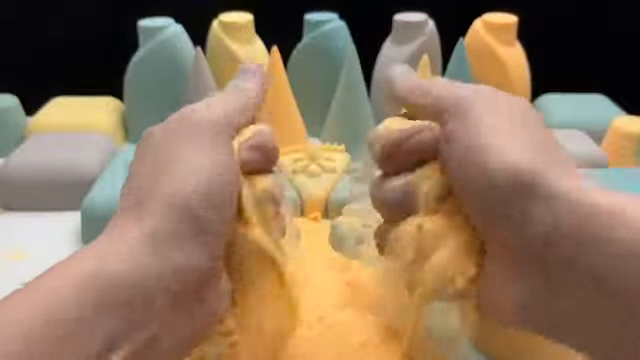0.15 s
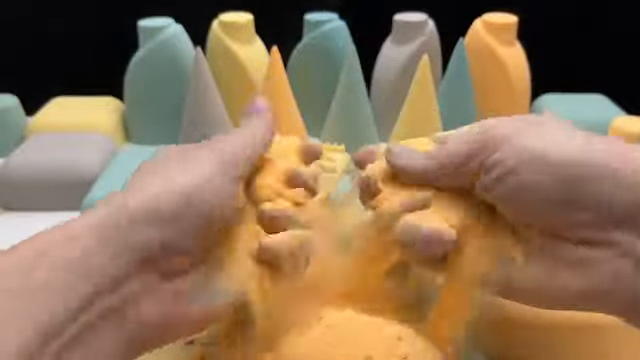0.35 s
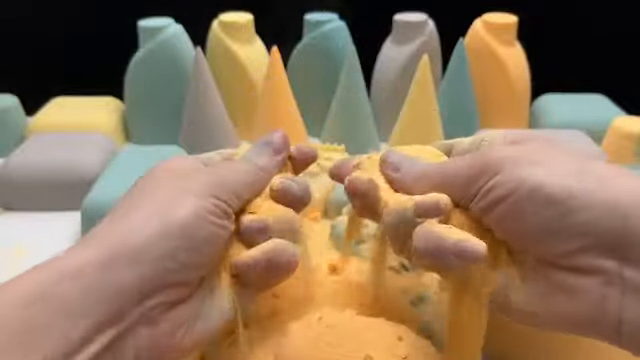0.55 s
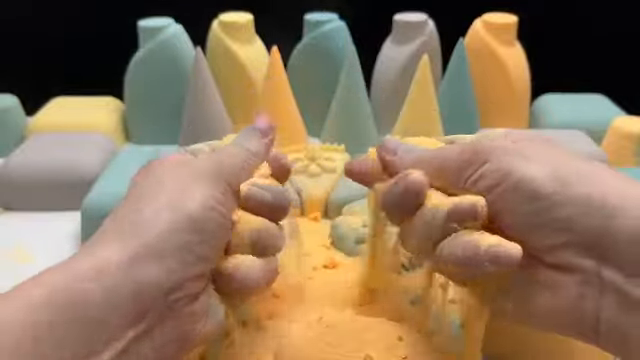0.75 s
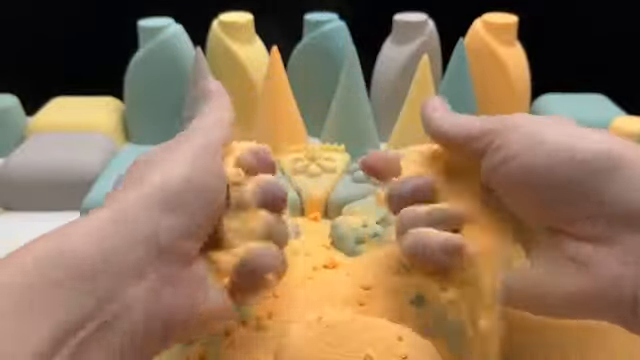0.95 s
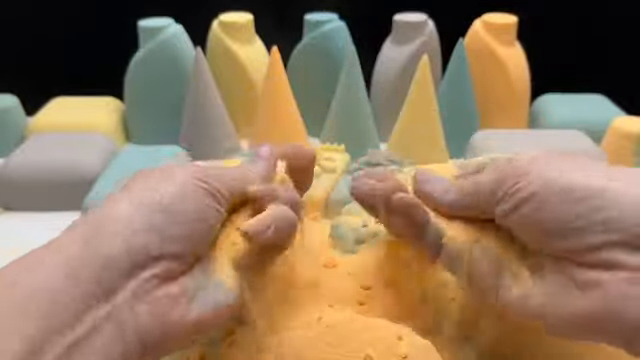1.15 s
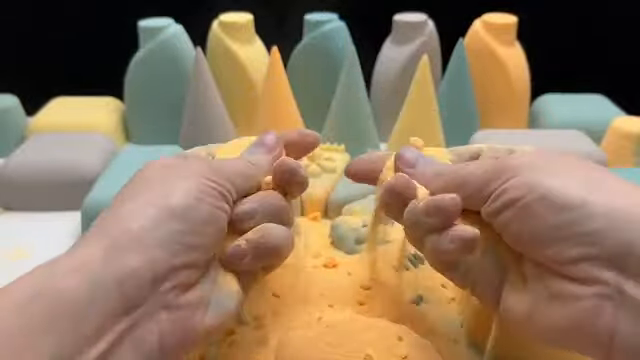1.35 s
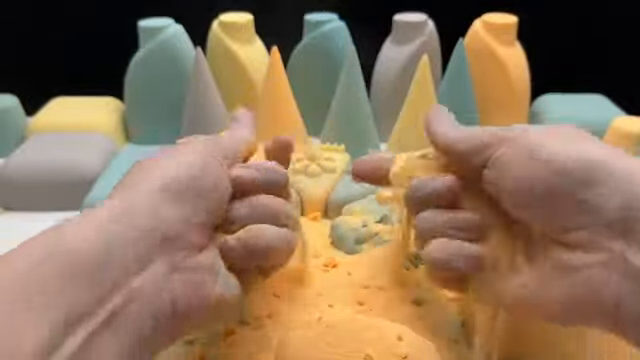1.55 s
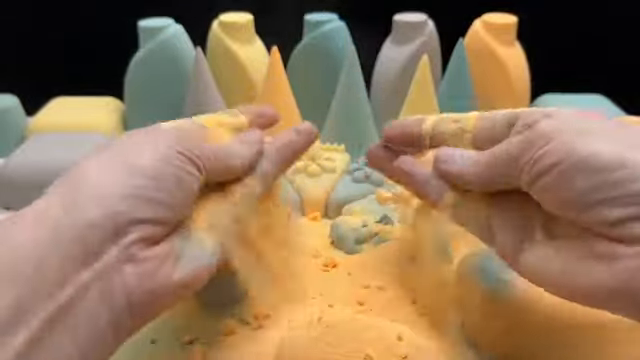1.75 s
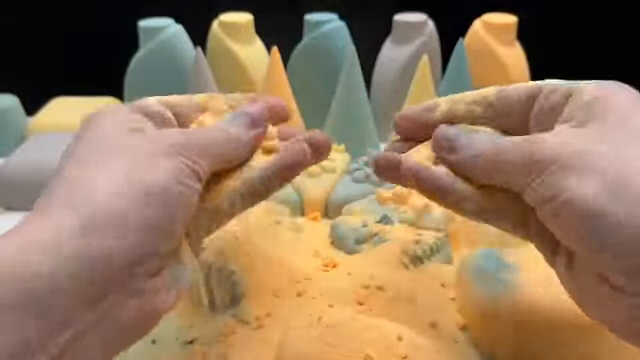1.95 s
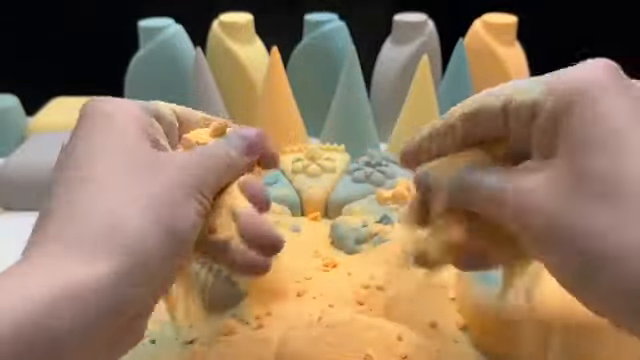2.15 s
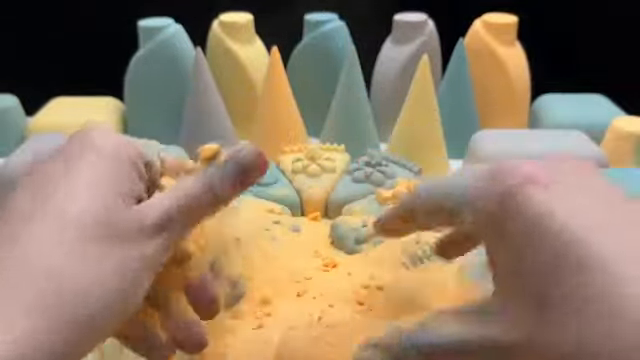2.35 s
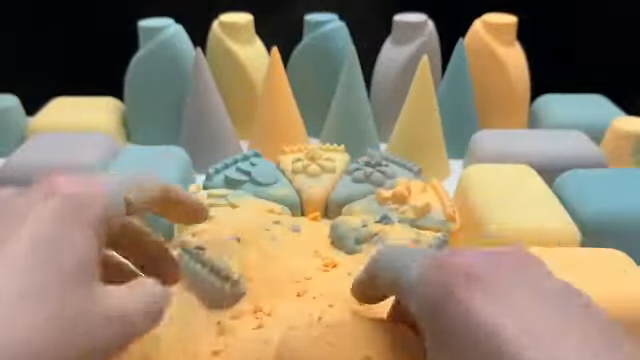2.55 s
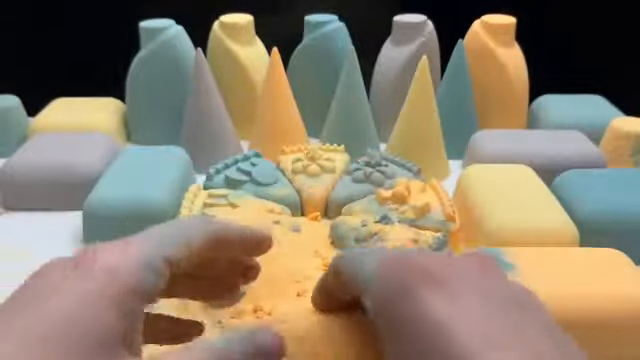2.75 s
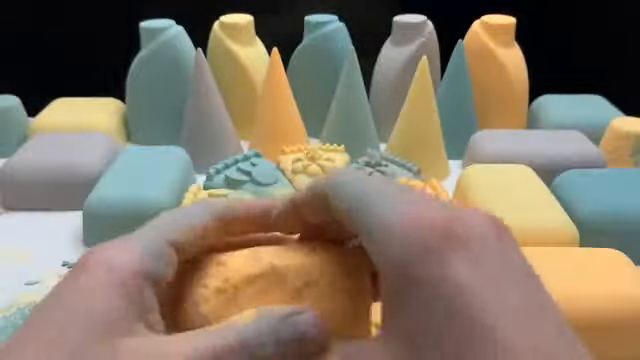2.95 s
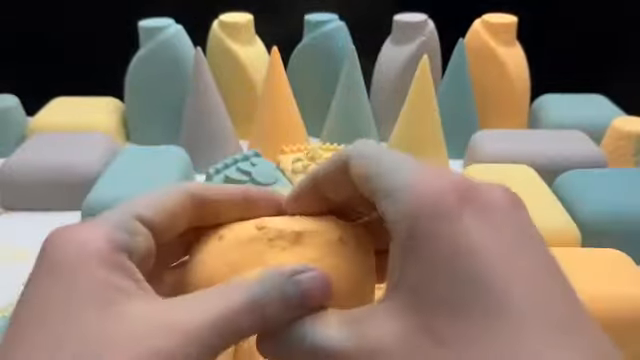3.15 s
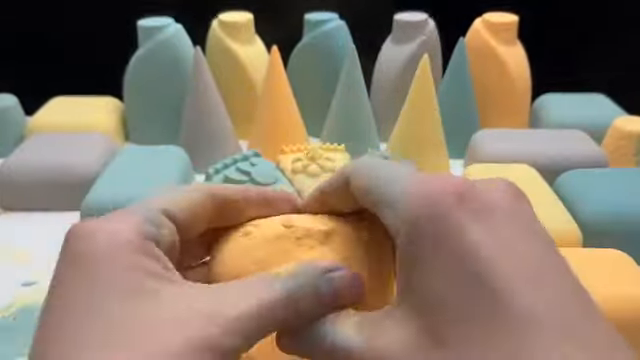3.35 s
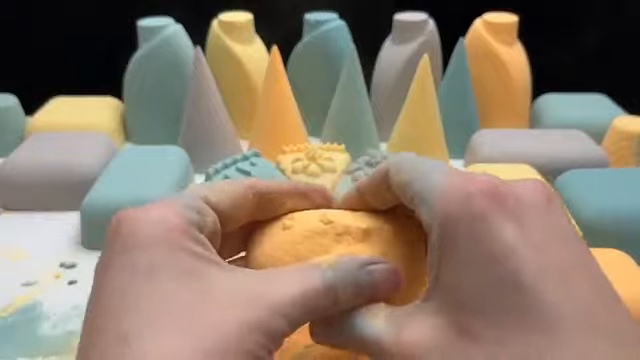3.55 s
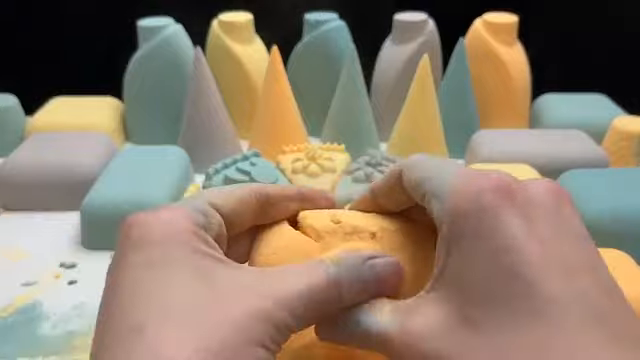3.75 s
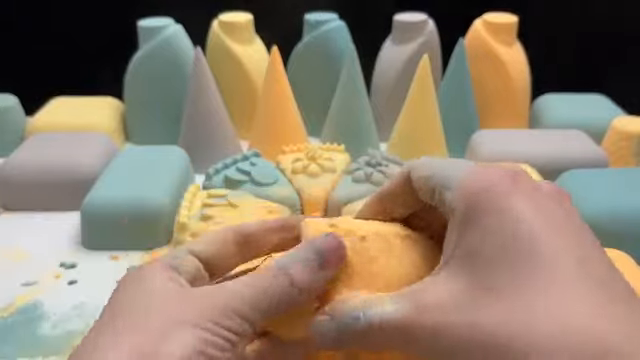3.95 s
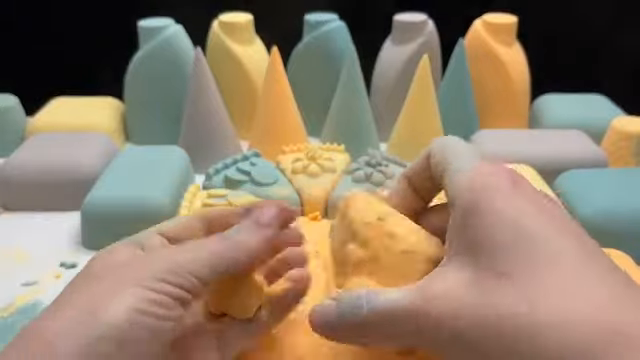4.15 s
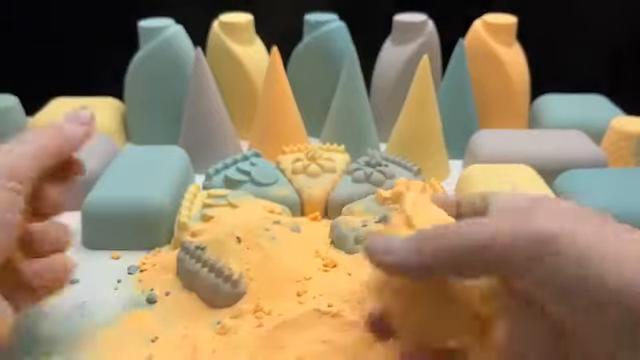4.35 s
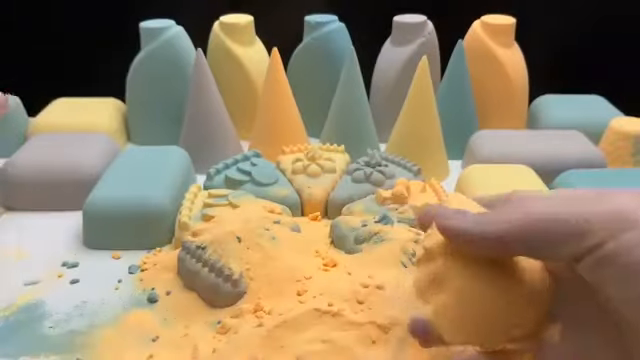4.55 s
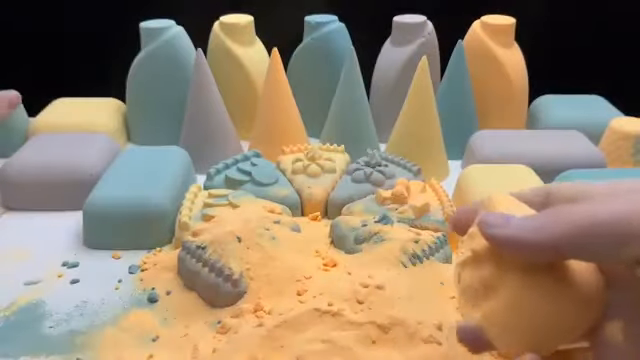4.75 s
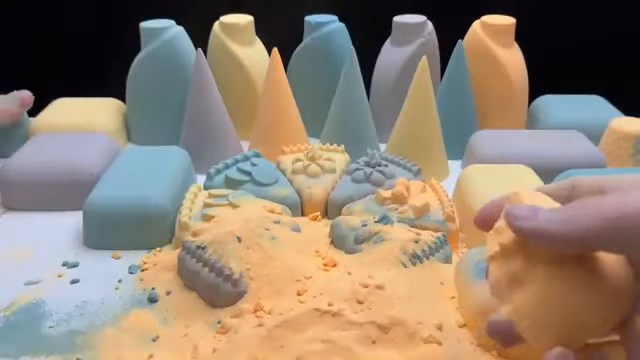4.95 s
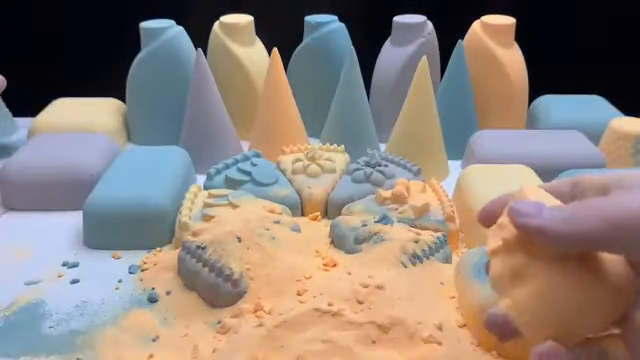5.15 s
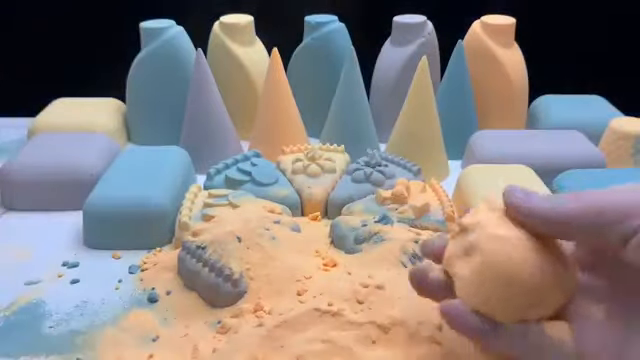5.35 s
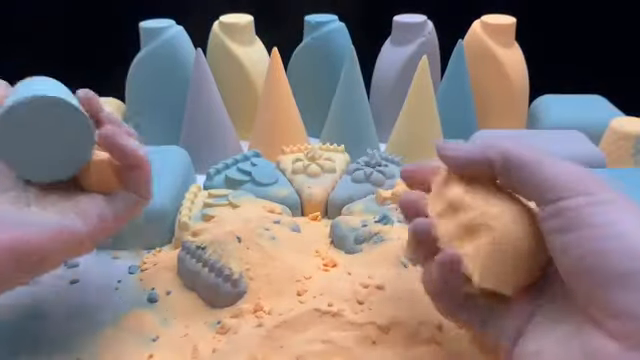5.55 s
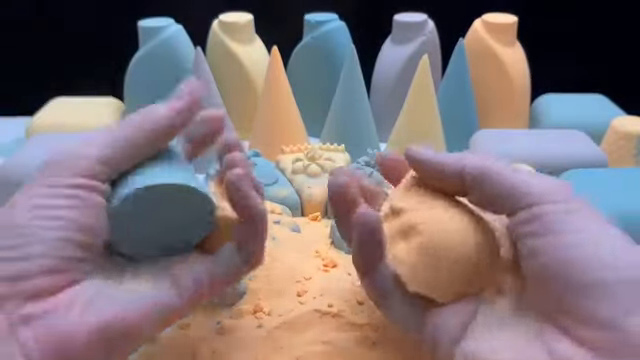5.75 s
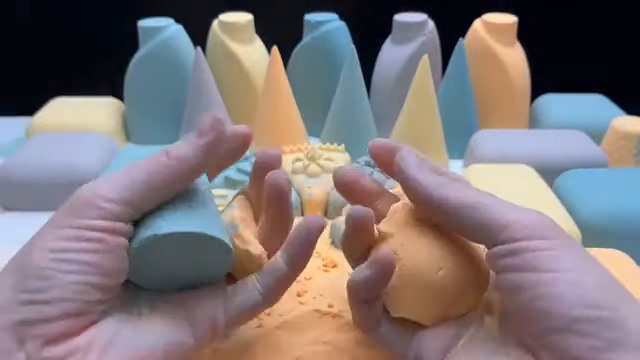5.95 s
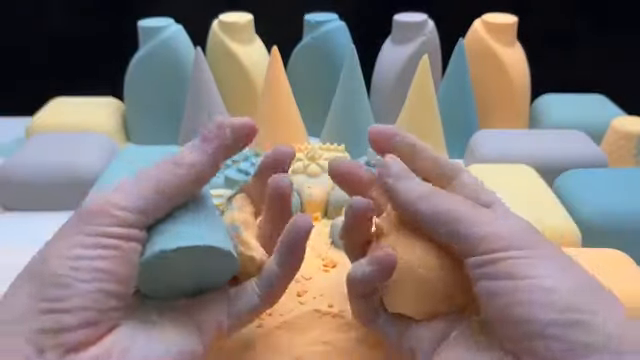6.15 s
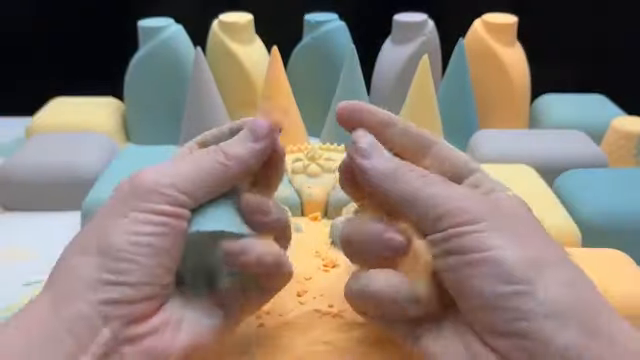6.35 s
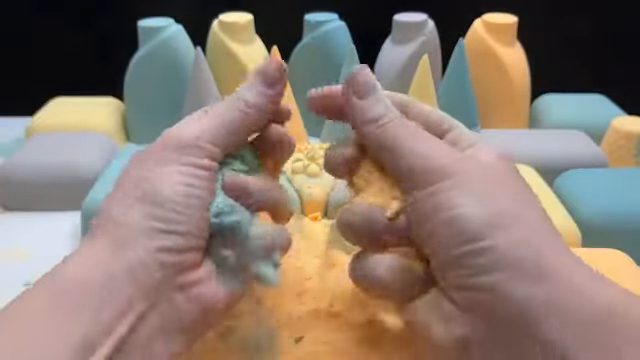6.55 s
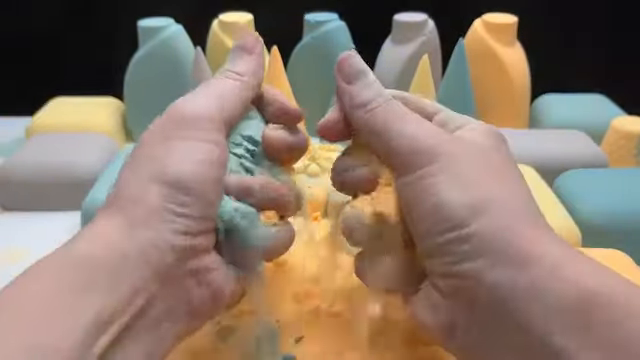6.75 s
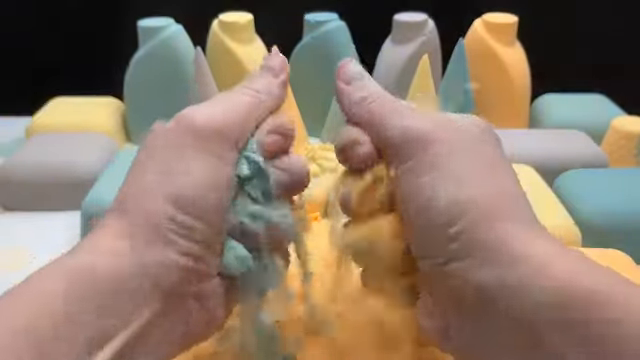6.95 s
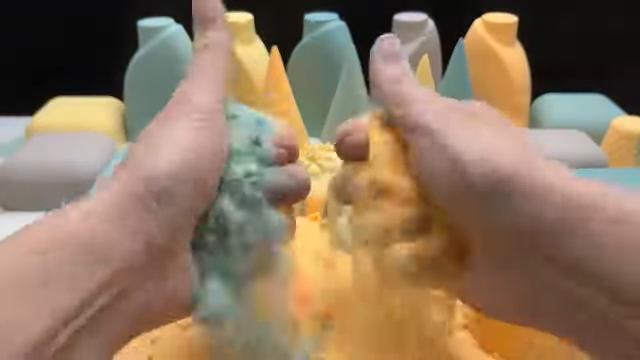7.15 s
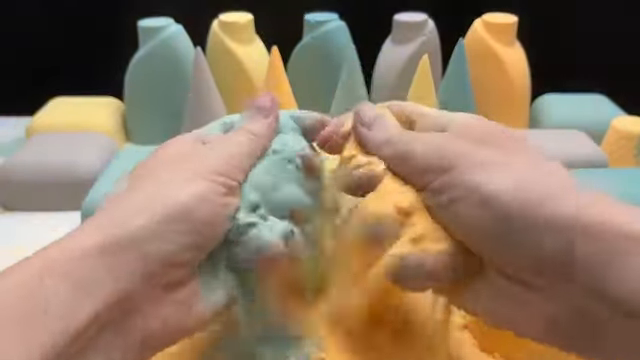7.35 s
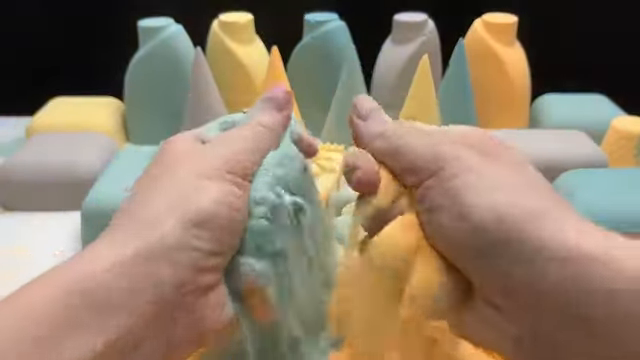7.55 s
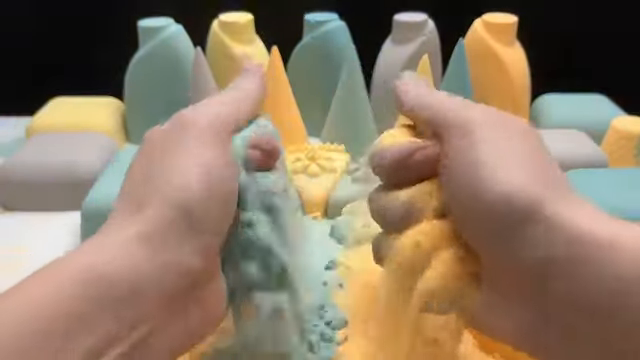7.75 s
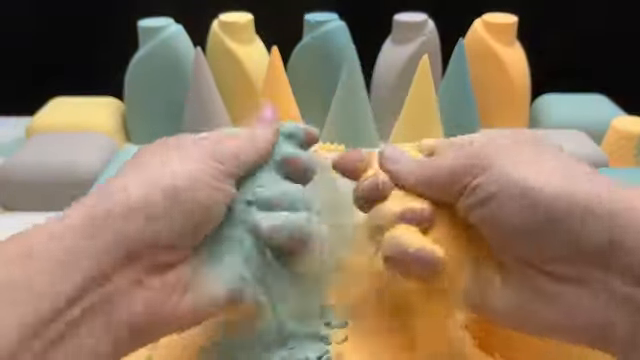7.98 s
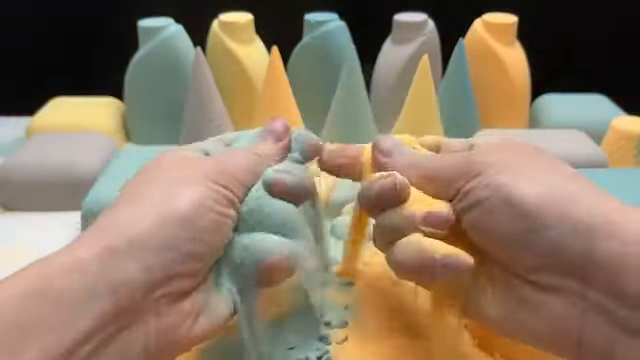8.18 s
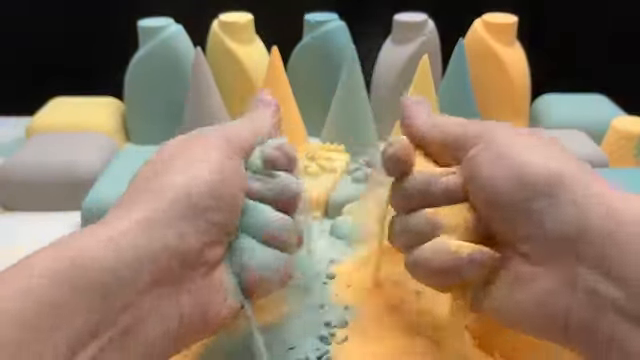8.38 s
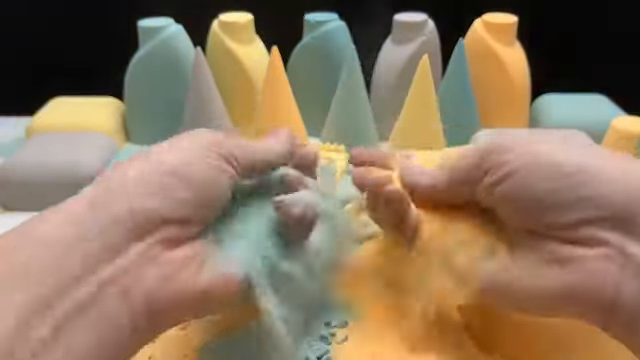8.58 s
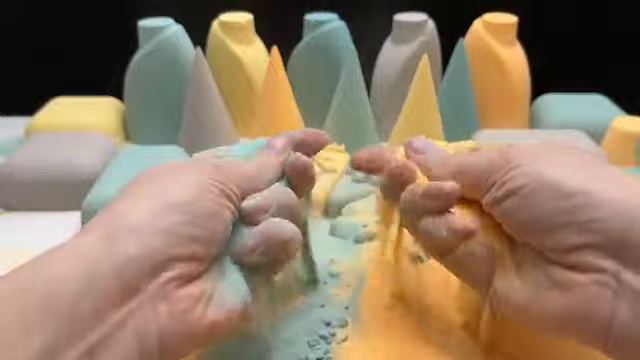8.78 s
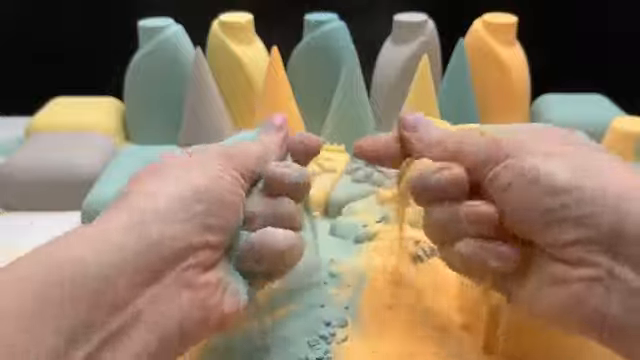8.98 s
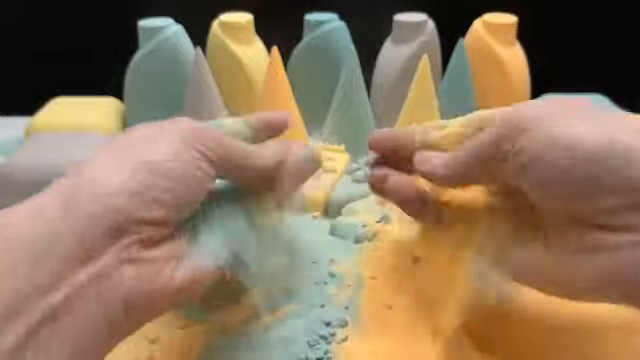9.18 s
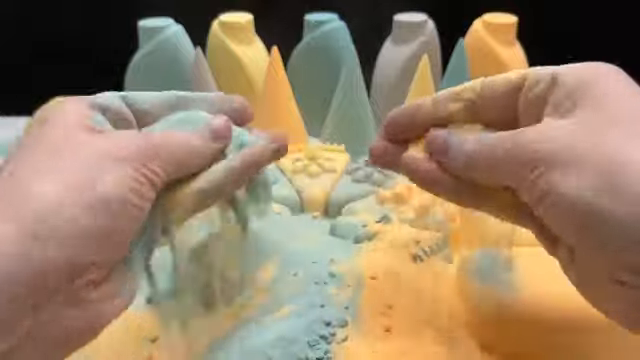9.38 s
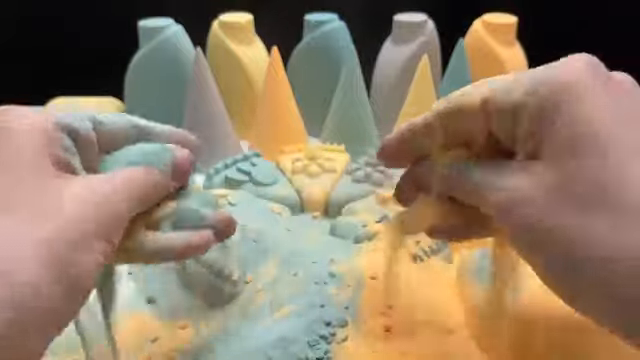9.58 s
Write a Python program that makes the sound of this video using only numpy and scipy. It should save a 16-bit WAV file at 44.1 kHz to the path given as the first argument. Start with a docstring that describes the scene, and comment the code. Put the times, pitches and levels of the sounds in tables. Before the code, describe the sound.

Very close stereo in a small quiet room: hands squeeze crumbly powder in four soft gritty crunches, grains hissing and lumps plopping into the heap. A quieter stretch follows, with fingers brushing a smooth block and one crisp crack. Then two blocks are crushed together, with loud dense crackling and knocks, followed by gentler squeezes and pouring.

```python
"""Two hands squeeze soft moulded blocks of baking soda close to a pair of microphone ports in a small room.
Lumps break off and plop into the heap below: short sine waves whose pitch dives as they sink.
Crumbs and hard chips fall with them, crusts crack, and loose powder pours as streams of tiny clicks.
The grains rubbed between the fingers make a fine gritty hiss, from denser streams of clicks.
Coloured noise makes a low room rumble; the knocks ring briefly in the room."""
import sys
import numpy as np
from scipy import signal
from scipy.fft import rfft, irfft, next_fast_len
from scipy.io import wavfile

SR = 44100
rng = np.random.default_rng(int(sys.argv[2]) if len(sys.argv) > 2 else 0)


def int16_out(signal):
    """Quantize to a 16-bit WAV file."""
    q = np.round(np.clip(np.atleast_2d(signal).T, -1, 1) * 32767)
    wavfile.write(sys.argv[1], SR, q.astype(np.int16))


N = 424241
TIME = np.arange(N) / SR
PADDED = next_fast_len(N + SR // 2)   # room for half a second of tail
BINS_HZ = np.maximum(np.arange(PADDED // 2 + 1) * SR / PADDED, 1)
PORT_SIGNS = np.array([[1], [-1]])   # left, right

# the big lumps landing in the heap, before each layer's trim:
# [t/s, level/dB, settling time/s, pitch at first contact f/Hz, level of its cracking skin/dB]
LUMPS = [(.049, -32, .0066, 4430, -37), (.1039, -26.5, 0.004, 7000, -29), (0.1221, -15, 0.0031, 2900, -25),
         (.585, -22, 0.009, 2140, -36), (0.6262, -31, .008, 1480, -42), (.635, -35, .004, 2500, -34),
         (0.6516, -30, .0034, 1480, -33), (0.6671, -19, 0.0073, 4740, -27),
         (0.6722, -28, 0.0038, 1280, -38), (0.7098, -27.5, 0.0059, 6040, -33),
         (1.2906, -21.5, 0.0074, 4380, -20.5), (1.3423, -20.5, 0.0029, 4950, -18),
         (1.363, -26, 0.0081, 6000, -19), (1.3786, -21, 0.0016, 7000, -21),
         (1.918, -16.5, 0.00099, 4220, -13), (1.9774, -30, 0.0035, 4650, -25),
         (1.984, -27.5, .0062, 3900, -25), (2.0012, -29, .003, 3030, -33), (2.0185, -26, .005, 3640, -24),
         (3.606, -19.5, 0.0032, 5700, -15.5), (6.3677, -17.5, 0.0023, 1640, -28),
         (6.3895, -12.5, 0.0017, 7100, -19), (6.4116, -19, 0.0029, 5960, -27),
         (6.5334, -21.5, .0062, 5950, -29), (6.5464, -29, .003, 3000, -29),
         (6.601, -16.5, 0.003, 6000, -29), (6.6464, -20.5, 0.0034, 6040, -25),
         (6.6837, -24, 0.006, 6000, -24), (6.7444, -23.5, 0.016, 1530, -40),
         (6.7642, -14.5, 0.0015, 3640, -19), (6.783, -15.5, 0.0012, 2250, -19),
         (6.7978, -20, 0.0016, 1500, -31), (6.8226, -17.5, 0.0021, 7000, -13.5),
         (6.8271, -18, 0.013, 2350, -28), (6.8577, -18, 0.016, 5070, -13), (6.875, -12, 0.0017, 5000, -27),
         (6.8948, -21, 0.0018, 4000, -23), (6.95, -23.5, 0.002, 3470, -27),
         (6.9561, -25.5, 0.017, 6920, -20), (6.967, -22.5, 0.0017, 4600, -22),
         (6.9796, -26, .002, 3500, -23), (7.4222, -24, 0.0013, 1830, -30), (7.5473, -26, 0.0031, 2500, -32),
         (7.5532, -31, .003, 2500, -32), (7.578, -35, 0.0027, 3000, -30), (7.6434, -20, 0.0021, 6000, -23),
         (7.6492, -24, .005, 7000, -24), (7.6958, -16.5, 0.0037, 1890, -28),
         (7.734, -30, 0.0018, 2500, -26), (7.7416, -17.5, 0.0024, 1570, -35),
         (7.791, -20, 0.0034, 2540, -19), (7.7942, -19.5, 0.005, 1420, -38),
         (8.159, -18, 0.0047, 1610, -26), (8.2027, -27, 0.0033, 1800, -33), (8.211, -23, 0.0037, 2300, -34),
         (8.2243, -26.5, 0.017, 1420, -35), (8.244, -21, 0.005, 2950, -25),
         (8.308, -20.5, 0.0031, 2400, -30), (8.314, -30, 0.0018, 3000, -32),
         (8.7696, -14, 0.0036, 5500, -14.5), (8.797, -21, 0.0019, 4560, -26),
         (8.8067, -21.5, .0031, 4740, -29), (8.8264, -31, .002, 3500, -24), (8.87, -26, 0.0075, 5000, -29),
         (8.8792, -35, 0.0028, 3000, -23), (8.91, -28, .004, 2500, -29), (8.943, -27.5, 0.0048, 5670, -25),
         (9.493, -30, 0.0064, 3700, -40), (9.5041, -26.5, 0.002, 4500, -26),
         (9.5155, -32, 0.0027, 2980, -22)]
# colour of coarse grains grinding: [f/Hz, level/dB]
GRIND_COLOUR = [(500, -17), (1200, -5.5), (1550, -5.5), (1900, 0.5), (2600, 2.5), (3400, 1), (4800, -2.5),
                (7500, -5), (14000, -48)]
# how alike the two ports hear a wide sound: [f/Hz, likeness 0-1]
LIKENESS = [(60, .92), (250, .78), (700, .52), (1400, .2), (2000, .75), (3800, .38), (6500, .55),
            (7500, .72), (8200, .97), (8800, .95), (9500, .68), (12000, .86), (15000, .65)]


def from_db(db):
    """Decibels to gain."""
    return np.exp(np.asarray(db) * np.log(10) / 20)


def power_db(power):
    """Power to decibels."""
    return 10 * np.log10(power)


def rms_one(x):
    """Scale to unit rms."""
    return x / np.sqrt(np.mean(x ** 2) + 1e-20)


def at_bins(points):
    """A table over log frequency, read at every spectral bin."""
    hz, value = np.transpose(points)
    return np.interp(np.log(BINS_HZ), np.log(hz), value)


def add(track, s, sound):
    """Mix a sound into a track at a time."""
    start = int(s * SR)
    part = sound[..., :max(N - start, 0)]
    track[..., start:start + part.shape[-1]] += part


def drift(per_s):
    """A slow random wander with rms 1, heading for a new random value per_s times a second."""
    knots = rng.standard_normal(4096)
    return rms_one(np.interp(TIME * per_s, np.arange(len(knots)), knots))


def grains(per_s, spread_db):
    """Two unrelated streams of tiny clicks with random times, sizes and signs."""
    count = int(per_s * N / SR) * 2
    when, size, sign = rng.random((count, 3)).T
    # a positive spread makes a few clicks large, a negative one makes a few small
    size_db = spread_db * np.minimum(-np.log(1 - size), 4)
    clicks = from_db(size_db) * (2 * sign - 1)
    return np.bincount((when * 2 * N).astype(int), clicks, 2 * N).reshape(2, N)


def spread_source(streams, colour):
    """Colour two streams and share them between the ports as a wide source; rms 1."""
    mid, side = rfft(streams, PADDED) * from_db(at_bins(colour))
    alike = np.clip(at_bins(LIKENESS), 0, .99)
    ports = np.sqrt(1 + alike) * mid + np.sqrt(1 - alike) * side * PORT_SIGNS
    return rms_one(irfft(ports, PADDED)[:, :N])


def swell(s, db, rise_s, fall_s, shape):
    """Power of a movement that builds up to a moment and dies away; shape 1 is exponential, 2 a bell."""
    away = np.maximum((s - TIME) / max(rise_s, 1e-3), (TIME - s) / max(fall_s, 1e-3))
    power, near = np.zeros(N), away < 10
    power[near] = from_db(db) ** 2 * np.exp(-2 * away[near] ** shape)
    return power


def slips(per_s, fade_s):
    """Packed powder gives way in sudden little slides that fade out; spread 1."""
    starts = (rng.random(N) < per_s / SR) * rng.random(N)
    slides = signal.lfilter([1], [1, -np.exp(-1 / (fade_s * SR))], starts + 1e-18)
    return rms_one(slides - slides.mean())


def plop(settle_s, contact_hz, turns=1.24):
    """A lump sinks into powder: the pitch dives as the contact widens, and dies within a few cycles."""
    t = TIME[:SR // 25]
    phase = 2 * np.pi * turns * np.log1p(t * contact_hz / turns)
    return np.sin(phase) * np.exp(-(t / max(settle_s, 1e-4)) ** (3 / 2))


def halts_db():
    """All the hand sounds dip as the fingers stop, and return quickly as they turn back."""
    # the fingers stop between two movements: [t/s, dip/dB, slowing time/s, restarting time/s]
    stops = [(1.105, -2.5, .04, .02), (1.75, -4, 0.056, 0.019), (2.585, -4, 0.026, .015),
             (2.96, -0.5, .04, .03), (5.335, -2.5, .03, .025), (7.32, -2.5, 0.04, .025),
             (8.69, -4, 0.08, .025), (9.28, -5, 0.11, .03)]
    total_db = 0
    for s, db, slow_s, restart_s in stops:
        side_s = np.where(TIME < s, slow_s, restart_s)
        total_db = total_db + db * np.exp(-((TIME - s) / side_s) ** 2)
    return total_db


def hand_work():
    """Add up the power of every hand movement into levels of pouring, grinding, sifting and brushing."""
    # the fists close and powder pours, then the fingers slide open, before each layer's trim:
    # [t/s at the height of the pour, pour level/dB, rise/s, fall/s, hiss level of the grip/dB,
    #  delay of the slide/s, slide level/dB, release of the slide/s, grinding over sifting in the slide/dB]
    squeezes = [(.09, -41, .085, 0.13, -44, 0.077, -44, 0.25, -6),
                (.642, -41, 0.098, 0.16, -48.5, 0.19, -42, .17, -6),
                (1.32, -44.5, 0.06, 0.14, -51, 0.18, -43.5, 0.13, -4),
                (1.988, -45, 0.099, .11, -46, 0.27, -42.5, 0.068, -6.5),
                (6.416, -35.5, 0.056, 0.074, -37.5, 0.3, -45.5, 0.17, -5),
                (6.802, -35, 0.18, .17, -41.5, .18, -42, 0.22, -3.5),
                (7.671, -38.5, 0.25, 0.11, -42.5, 0.11, -43, 0.21, -8.5),
                (8.208, -40.5, 0.072, 0.16, -52, 0.22, -41.5, .13, -6.5),
                (8.81, -40.5, 0.049, 0.15, -52, 0.21, -42.5, 0.14, -3.5),
                (9.51, -52, 0.1, .043, -50.5, .2, -47.5, .12, 0.5)]
    # fingers brush over a block while picking it up and turning it, before each layer's trim:
    # [t/s at the middle, skin hiss level/dB, half length/s, grinding over skin hiss/dB]
    brushes = [(0.358, -54.5, 0.043, -1), (1.184, -53.5, 0.048, 2.5), (2.108, -43.5, 0.028, -4),
               (2.627, -64, 0.023, -25), (2.794, -54.5, 0.11, -21), (3.08, -52, 0.085, -25),
               (3.14, -50, 0.035, -14), (3.298, -53, 0.085, -27), (3.4, -51.5, 0.074, -19),
               (3.6, -53.5, 0.13, -20), (3.697, -58, 0.14, -8), (3.861, -46.5, 0.054, -7.5),
               (3.97, -54.5, 0.058, -6.5), (4.113, -58.5, 0.053, -10), (4.242, -49.5, 0.069, -15),
               (4.363, -54, 0.045, -8.5), (4.51, -61.5, 0.072, -13), (4.777, -70.5, 0.078, -25),
               (4.642, -59.5, 0.04, -14), (4.968, -63, 0.04, -9), (5.252, -53, 0.067, -17),
               (5.374, -60, 0.052, -27), (5.468, -47, 0.047, -11), (5.596, -41, .05, -12.5),
               (5.692, -49, 0.065, -11.5), (5.804, -50, 0.072, -15), (5.923, -54, 0.1, -17),
               (6.047, -53, 0.038, -13), (6.255, -51, 0.091, -28), (7.41, -57, 0.038, -3),
               (8.03, -59.5, 0.067, -1), (9.382, -57, .04, 3)]
    grip_lead, grip_fall_s, grip_coarse_db = 1.54, 0.16, -3   # rise over that of the pour; fall; grind over sift
    slide_rise_s = 0.2
    pour_shape, stroke_shape, brush_shape = 1.194, 1.5, 1.6
    # powdery hands are never quite still: pour, grind, sift
    pouring, grinding, sifting = from_db([-77.5, -91, -72.5]) ** 2
    skin = 1e-18
    for s, pour_db, rise_s, fall_s, grip_db, delay_s, slide_db, release_s, coarse_db in squeezes:
        grip = swell(s, grip_db, grip_lead * rise_s, grip_fall_s, stroke_shape)
        slide = swell(s + delay_s, slide_db, slide_rise_s, release_s, stroke_shape)
        pouring = pouring + swell(s, pour_db, rise_s, fall_s, pour_shape)
        grinding = grinding + grip * from_db(grip_coarse_db) ** 2 + slide * from_db(coarse_db) ** 2
        sifting = sifting + grip + slide
    for s, db, half_s, coarse_db in brushes:
        stroke = swell(s, db, half_s, half_s, brush_shape)
        grinding = grinding + stroke * from_db(coarse_db) ** 2
        skin = skin + stroke
    halted_db = halts_db()
    return [power_db(power) + halted_db for power in (pouring, grinding, sifting, skin)]


def room_tone(level_db=-70):
    """The faint even noise of the room."""
    # the still room: [f/Hz, level/dB]
    still_colour = [(40, -5), (130, -0.5), (260, 3.5), (500, -2.5), (900, -33), (1400, -42), (4000, -51),
                    (15000, -15.5)]
    return from_db(level_db) * spread_source(rng.standard_normal((2, N)), still_colour)


def rumble(pour_db, resting_db=-59.5, full_pour_db=-40, under_full_pour_db=-43.5, follows=0.66):
    """Low noise of the room, and of the table under falling powder."""
    # low noise: [f/Hz, level/dB]
    low_colour = [(15, -55), (30, -18), (48, -6), (64, 0), (95, -5.5), (140, -15.5), (250, -21.5),
                  (600, -28.5), (2000, -40)]
    # the table's level follows only a share of the pour's swing
    table_db = under_full_pour_db + follows * (pour_db - full_pour_db)
    power = from_db(resting_db) ** 2 + from_db(table_db) ** 2
    return np.sqrt(power) * spread_source(rng.standard_normal((2, N)), low_colour)


def room(x, early_s=0.005, treble_hz=1100, low_t60_s=0.31, treble_t60_s=0.21, level_db=-7):
    """A short diffuse tail whose treble dies first, with a few standing waves."""
    # colour of the tail: [f/Hz, level/dB]
    tail_colour = [(50, -10), (130, 0), (300, -2), (500, -1), (800, -4), (1400, 1), (2000, -3), (3500, -3),
                   (7000, -8), (15000, -16)]
    # standing waves: [f/Hz, level/dB, time to fall by 60 dB/s]
    standing_waves = [(129.8, -63, 0.63), (254.3, -56, 0.47), (306.5, -57.5, 0.43), (362.5, -62.5, 0.4),
                      (545, -54, 0.07), (779, -54.5, 0.1), (943, -52, 0.057)]
    t = TIME[:SR // 2]
    noise = rng.standard_normal((2, len(t))) * (1 - np.exp(-(t / early_s) ** 2))
    low = signal.sosfiltfilt(signal.butter(2, treble_hz, fs=SR, output="sos"), noise)
    tail = low * from_db(-60 * t / low_t60_s) + (noise - low) * from_db(-60 * t / treble_t60_s)
    tail *= from_db(level_db) / np.sqrt(np.sum(tail[0] ** 2))   # level before the colouring
    mid, side = rfft(tail, PADDED) * from_db(at_bins(tail_colour))
    alike = np.clip(at_bins(LIKENESS), 0, 1)
    response = np.sqrt((1 + alike) / 2) * mid + np.sqrt((1 - alike) / 2) * side * PORT_SIGNS
    modes = np.zeros(len(t))
    for hz, db, t60_s in standing_waves:
        modes += from_db(db - 60 * t / t60_s) * np.sin(2 * np.pi * hz * t)
    return irfft(rfft(x.mean(0), PADDED) * (response + rfft(modes, PADDED)), PADDED)[:, :N]


def nudges(rise_s=0.0052, table_hz=61.2):
    """The leaning hands bump the table, which gives a low, soft thud: a sine under a bell-shaped fade."""
    # bumps: [t/s, level/dB, half of the fading time/s]
    bumps = [(2.72, -54, .012), (3.6, -43, 0.013), (3.91, -48, 0.024), (4.045, -42.5, 0.021),
             (4.095, -47.5, 0.033), (4.17, -45, 0.013), (4.765, -45, 0.014), (4.9, -51, .03),
             (5.205, -48, 0.029), (6.366, -35, .035), (7.39, -39, .05), (8.235, -35, .025)]
    out, t = np.zeros(N), TIME[:SR // 4]
    for s, db, fade_s in bumps:
        envelope = (1 - np.exp(-t / rise_s)) * np.exp(-(t / (2 * fade_s)) ** 2)
        add(out, s, from_db(db) * np.sin(2 * np.pi * table_hz * t) * envelope)
    return out


def scuffs(detune=0.027):
    """A short swell of fine friction; a close pair of table resonances builds up in it and lingers."""
    # a hand or block scuffing over the powdery table:
    # [t/s at the middle, level/dB, half length/s, resonance f/Hz, its Q, its gain/dB, its delay/s]
    strokes = [(2.753, -53.5, 0.069, 955, 5.2, 20.5, 0), (5.115, -43, 0.045, 1675, 40, 14.5, 0.019)]
    # colour of the friction: [f/Hz, level/dB]
    scuff_colour = [(150, -12), (480, -4.5), (900, -17), (2300, -8), (4500, -6.5), (7000, -16),
                    (14000, -10)]
    out, friction = np.zeros((2, N)), spread_source(grains(11000, spread_db=3.5), scuff_colour)
    for s, db, half_s, hz, q, ring_db, late_s in strokes:
        out += friction * np.sqrt(swell(s, db, half_s, half_s, 3 / 2))
        drive_power = swell(s + late_s, db + ring_db, half_s, half_s + late_s, 3 / 2)
        drive = friction * np.sqrt(drive_power) + 1e-18
        for side in (-1, 1):
            out += signal.lfilter(*signal.iirpeak(hz * (1 + side * detune), q, fs=SR), drive) / 2
    return out


def cupped_hands(x, echo=0.18, path_s=.0005, travel=0.3, count=4):
    """Palms and table throw back near echoes whose colour shifts as the fingers move."""
    out, n = x.copy(), np.arange(N)
    for k in range(count):
        delay = path_s * SR * 2 ** k * np.exp(travel * drift(7))   # in samples
        out += echo * (-1) ** k * np.array([np.interp(n - delay, n, port) for port in x])
    return out / np.sqrt(1 + count * echo ** 2)


def brushing(brush_db, trim_db=2, slip_db=2.0):
    """Skin whispers over a whole block, hollowed by the palm that wraps it."""
    # skin on a dry block: [f/Hz, level/dB]
    skin_colour = [(1500, -21.5), (2430, -10.5), (3430, -6), (4680, -2), (5780, -5), (6610, 2),
                   (8300, -4.5), (10000, 3), (13000, 0.5), (14500, -2), (16000, -48)]
    hiss = spread_source(grains(26000, spread_db=-1.0), skin_colour)
    gain = from_db(brush_db + trim_db + slip_db * slips(per_s=34, fade_s=0.038))
    return cupped_hands(gain * hiss, echo=0.56, path_s=0.00043, travel=0.0776)


def rubbing(grind_db, sift_db, grind_trim_db=1, sift_trim_db=2, slip_db=2.0, grit_share=0.29):
    """Coarse grains grind with single ticks of grit among them, fine ones sift; both surge at each slide."""
    # colour of the fine grains: [f/Hz, level/dB]
    sift_colour = [(1500, -8), (3200, -0.5), (4800, 0.5), (6500, 2), (8300, -3.5), (10000, 4.5),
                   (12500, 1.5), (14500, -0.5), (16000, -82)]
    slip = slip_db * slips(per_s=49, fade_s=0.029)
    coarse = rms_one(grains(14000, spread_db=1.0)) + grit_share * rms_one(grains(380, spread_db=0.0))
    grind = from_db(grind_db + grind_trim_db + slip) * spread_source(coarse, GRIND_COLOUR)
    fine = spread_source(grains(26000, spread_db=2.0), sift_colour)
    sift = from_db(sift_db + sift_trim_db + slip / 2) * fine
    return cupped_hands(grind + sift)


def pour(pour_db, trim_db=-2, clumping_db=2):
    """Loose powder patters on the heap in uneven clumps."""
    # colour of the patter: [f/Hz, level/dB]
    pour_colour = [(70, -10), (130, -9.5), (280, 2.5), (500, -4), (850, 0.5), (1350, -6.5), (2200, -8.5),
                   (5000, -31.5)]
    gain = from_db(pour_db + trim_db + clumping_db * drift(90))
    return gain * spread_source(grains(2500, spread_db=1.0), pour_colour)


def crackle(pour_db, trim_db=-7, per_s=130, fade_s=0.0009, spread_db=3):
    """While powder breaks loose, bonds in the block give way in tiny uneven spurts."""
    # breaking bonds: [f/Hz, level/dB]
    bond_colour = [(150, -9), (400, -2), (1000, -2), (1500, 3), (2400, -3.5), (4000, -19), (9000, -20)]
    starts = np.abs(grains(per_s, spread_db)[0])
    spurts = signal.lfilter([1], [1, -np.exp(-1 / (fade_s * SR))], starts + 1e-18)
    noise = spread_source(rng.standard_normal((2, N)), bond_colour)
    return from_db(pour_db + trim_db) * rms_one(spurts) * noise


def crumbles(trim_db=1, per_s=330, rise_s=0.0018):
    """A broken piece goes on crumbling: a dying run of tiny dry cracks."""
    # runs of cracks, before the trim: [t/s, level/dB, fading time/s]
    runs = [(.125, -39, .025), (.67, -42, .035), (1.383, -36, 0.016), (2.02, -46, .03), (6.398, -33, .035),
            (6.755, -39, .04), (6.832, -35, .02), (6.862, -32, 0.033), (6.95, -38, .03),
            (7.652, -34, 0.038), (8.212, -43, .03), (8.8, -42, .03)]
    # their colour: [f/Hz, level/dB]
    crumble_colour = [(200, -16), (450, 0), (900, 1), (1400, -1), (2200, 1), (3200, -5), (5000, -12),
                      (10000, -26)]
    envelope, t = np.zeros(N), TIME[:SR // 4]
    for s, db, fade_s in runs:
        add(envelope, s, from_db(db + trim_db) * (1 - np.exp(-t / rise_s)) * np.exp(-t / fade_s))
    return envelope * spread_source(grains(per_s, spread_db=1.5), crumble_colour)


def snaps(trim_db=-9):
    """A crust of packed powder gives way with a short bright spurt of grains."""
    # breaking crusts, before the trim: [t/s, level/dB, fading time/s]
    crusts = [(1.28, -26.5, .016), (2.523, -38.5, 0.0072), (3.454, -32, 0.0058), (3.572, -32, .005),
              (3.6068, -21.5, 0.0049), (6.296, -20.5, 0.02), (6.387, -15, 0.0094), (6.534, -21, 0.008),
              (6.86, -17, 0.0036), (8.869, -28, 0.0037)]
    envelope = np.zeros(N)
    for s, db, fade_s in crusts:
        add(envelope, s, from_db(db + trim_db) * np.exp(-TIME[:SR // 10] / fade_s))
    return envelope * rms_one(grains(20000, spread_db=-20.0))


def chips(pour_db, per_s=38, trim_db=7, spread_db=3, settle_s=0.0016, contact_hz=4500):
    """Hard little chips drop among the crumbs at uneven intervals and tick."""
    out = np.zeros((2, N))
    for k, (late, size, shape) in enumerate(rng.random((int(per_s * N / SR), 3))):
        s = (k + late) / per_s
        db = pour_db[min(int(s * SR), N - 1)] + trim_db + spread_db * (2 * size - 1)
        bulk = 2 ** (2 * shape - 1)   # half to double; bulky chips sound lower and longer
        add(out, s, from_db(db) * plop(settle_s * bulk, contact_hz / bulk))
    return out


def crumbs(pour_db, per_s=110, trim_db=3, settle_s=0.0056, contact_hz=3500, pan_db=3):
    """Small crumbs plop at random, their level following the pour that carries them."""
    out = np.zeros((2, N))
    for when, shape, pan in rng.random((int(per_s * N / SR), 3)):
        db = pour_db[int(when * N)] + trim_db
        bulk = 2 ** (2 * shape - 1)   # half to double
        sides = from_db(pan_db * (2 * pan - 1.5) * PORT_SIGNS)   # mostly stronger on the right
        add(out, when * N / SR, from_db(db) * sides * plop(settle_s * bulk, contact_hz / bulk))
    return out


def cracks(trim_db=-3, pan_db=2, crack_hz=2800, fade_s=.00042, spread_oct=.15):
    """The dry skin of each lump cracks as it lands: a click of about two cycles."""
    out, t = np.zeros((2, N)), TIME[:SR // 100]
    age = t / fade_s
    for (s, _, _, _, db), (pitch, pan) in zip(LUMPS, rng.standard_normal((len(LUMPS), 2))):
        hz = crack_hz * 2 ** (spread_oct * pitch)
        click = np.sin(2 * np.pi * hz * t) * 2 * age * np.exp(-age ** 2)
        add(out, s, from_db(db + trim_db + pan * pan_db / 2 * PORT_SIGNS) * click)
    return out


def fragments(trim_db=-13, scatter_s=0.00422, smaller=0.68, lag_s=0.00059, count=3):
    """A lump lands in pieces: smaller ones follow within milliseconds and give each its own colour."""
    out = np.zeros((2, N))
    for (s, db, settle_s, contact_hz, _), pieces in zip(LUMPS, rng.random((len(LUMPS), count, 3))):
        for late, bulk, place in pieces:
            piece_settle_s = settle_s * smaller * (bulk + .5)
            sound = from_db(db + trim_db) * plop(piece_settle_s, contact_hz * (1 - bulk / 2))
            for port, sign in zip(out, (1, -1)):
                add(port, s + late * scatter_s + sign * (place - .5) * lag_s, sound)
    return out


def lumps(pan_db=3.5, lag_s=.00007, burst_db=-19, burst_s=0.0058):
    """Each lump plops somewhere across the heap and bursts into a short spray of grit."""
    out, spray, t = np.zeros((2, N)), np.zeros(N), TIME[:SR // 10]
    places = rng.standard_normal((len(LUMPS), 2))
    for (s, db, settle_s, contact_hz, _), (pan, lag) in zip(LUMPS, places):
        sound = from_db(db) * plop(settle_s, contact_hz)
        for port, sign in zip(out, (1, -1)):
            add(port, s + sign * lag * lag_s / 2, sound * from_db(sign * pan * pan_db / 2))
        add(spray, s, from_db(db + burst_db) * np.exp(-t / burst_s))
    return out, spray * spread_source(grains(7900, spread_db=2.0), GRIND_COLOUR)


def muffled_by_heap(sound):
    """The soft heap dulls the landings; minimum phase, so nothing sounds before the contact."""
    # what the heap lets through: [f/Hz, level/dB]
    heap_colour = [(50, -11.5), (140, 3), (200, -2), (320, 1), (850, 0.5), (1400, -5.5), (2000, -1.5),
                   (3200, -3), (4800, -16), (9000, -23)]
    # folding the cepstrum onto positive times gives the minimum phase
    cepstrum = irfft(np.log(from_db(at_bins(heap_colour))), PADDED)
    cepstrum[1:] *= 2 * (np.arange(1, PADDED) < PADDED / 2)
    return irfft(rfft(sound, PADDED) * np.exp(rfft(cepstrum)), PADDED)[:, :N]


def scene():
    """Falling lumps and crumbs ring in the room; powder pours and hisses around them."""
    pour_db, grind_db, sift_db, brush_db = hand_work()
    landings, spray = lumps()
    fallen = landings + fragments() + crumbs(pour_db) + chips(pour_db)
    knocks = muffled_by_heap(fallen) + cracks() + spray
    knocks = knocks + crackle(pour_db) + crumbles() + snaps() + scuffs()
    powder = pour(pour_db) + rubbing(grind_db, sift_db) + brushing(brush_db)
    background = rumble(pour_db) + nudges() + room_tone()
    return knocks + room(knocks) + powder + background


def record(dry, cutoff_hz=15100):
    """The two ports hear with unlike phase and strength; the top is cut."""
    # strength: [f/Hz, left over right/dB]
    port_balance = [(1000, 0.36), (2000, 0), (4200, 2), (8000, 0.5)]
    # phase: [f/Hz, lead of the left port/radians]
    port_phase = [(20, 0), (1000, -.3), (2000, -.3), (3200, -.9), (5000, 0), (6600, 1.2), (7400, 2.3),
                  (7900, 3.0), (8800, 3.35), (9800, 4.4), (11200, 5.4), (12800, 7.0), (14000, 8.0),
                  (15000, 9.0)]
    # each port takes half of the difference
    difference = (np.log(from_db(at_bins(port_balance))) + 1j * at_bins(port_phase)) / 2
    ports = irfft(rfft(dry, PADDED) * np.exp(difference * PORT_SIGNS), PADDED)[:, :N]
    return signal.sosfilt(signal.ellip(10, .2, 70, cutoff_hz, fs=SR, output="sos"), ports)


dry = scene()
out = record(dry)
int16_out(out)
```